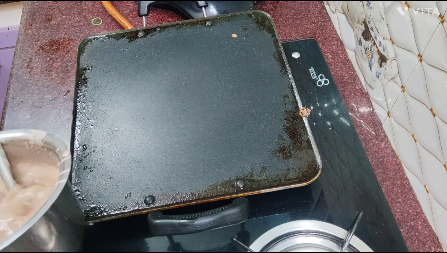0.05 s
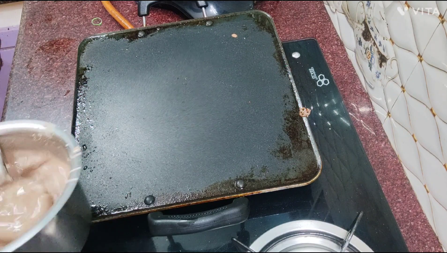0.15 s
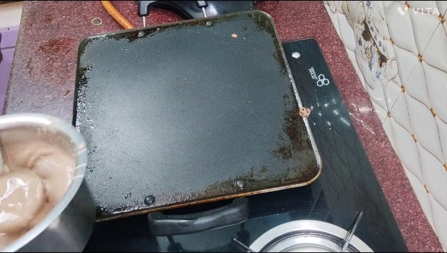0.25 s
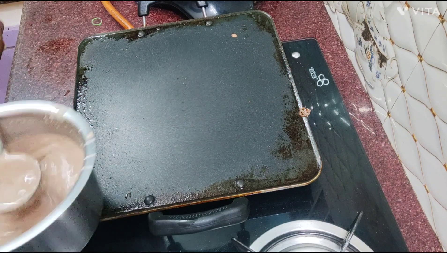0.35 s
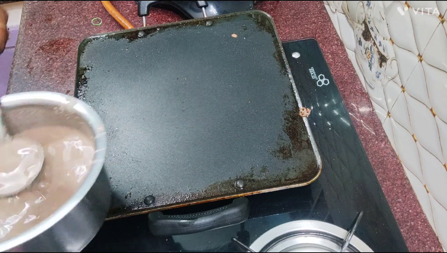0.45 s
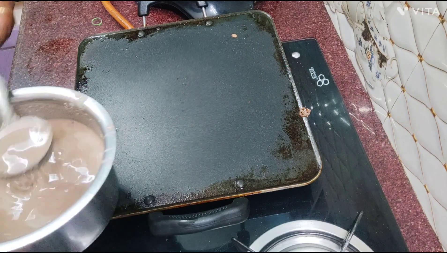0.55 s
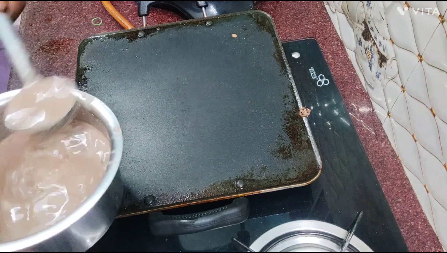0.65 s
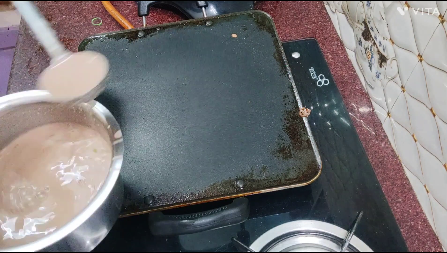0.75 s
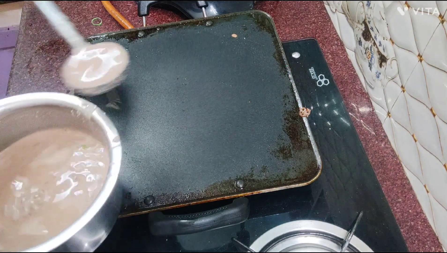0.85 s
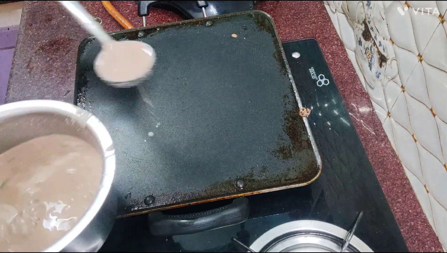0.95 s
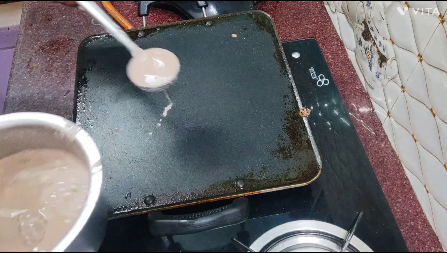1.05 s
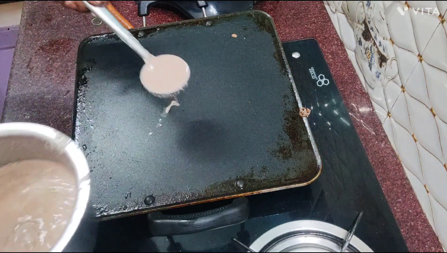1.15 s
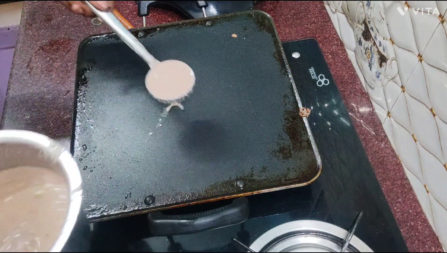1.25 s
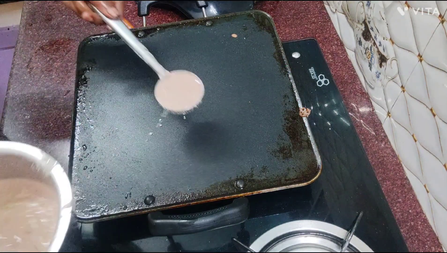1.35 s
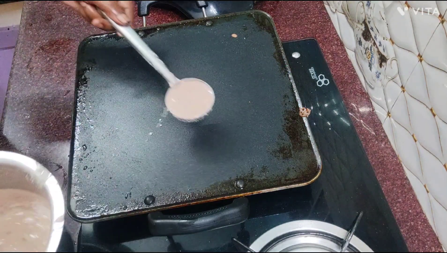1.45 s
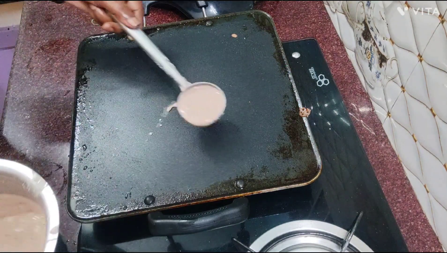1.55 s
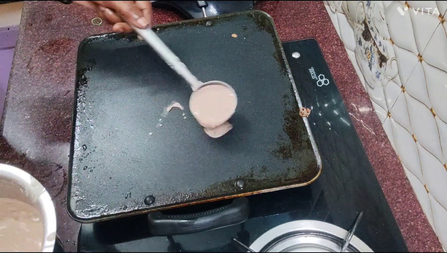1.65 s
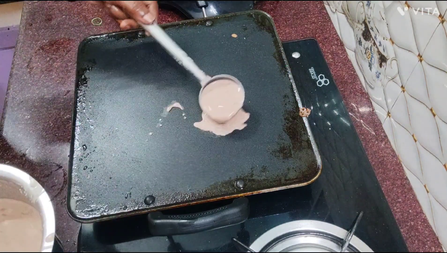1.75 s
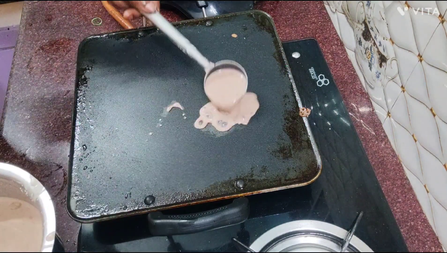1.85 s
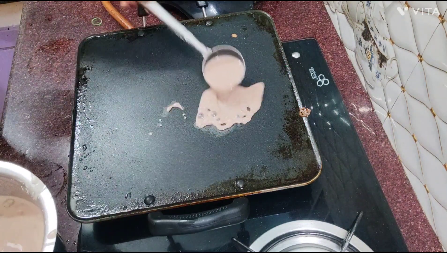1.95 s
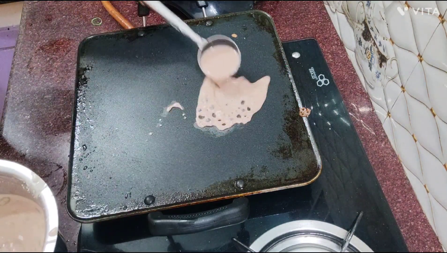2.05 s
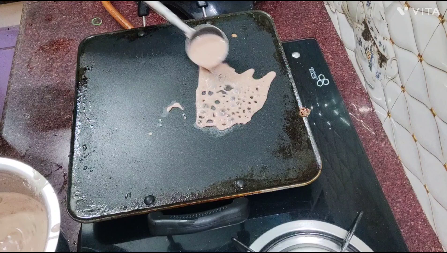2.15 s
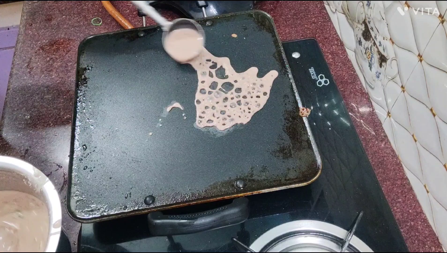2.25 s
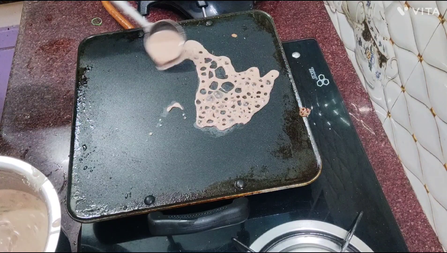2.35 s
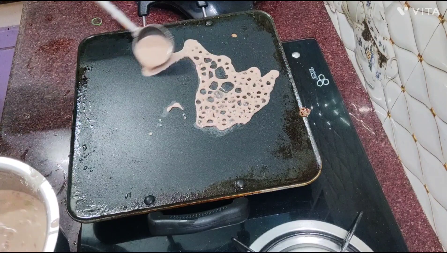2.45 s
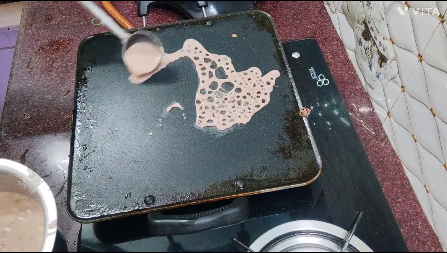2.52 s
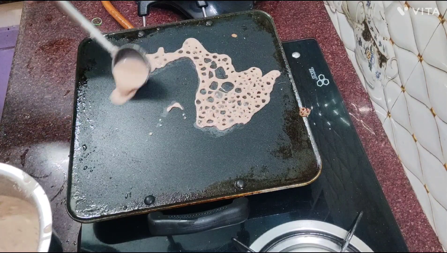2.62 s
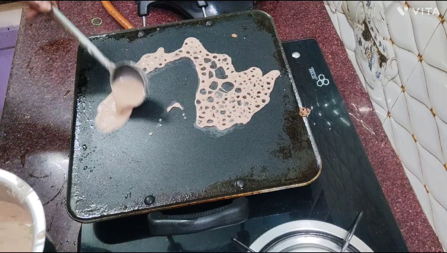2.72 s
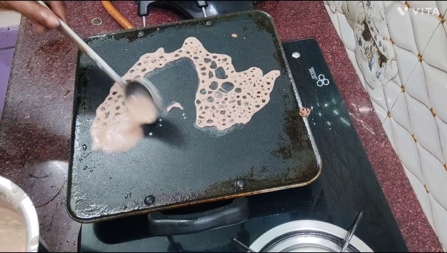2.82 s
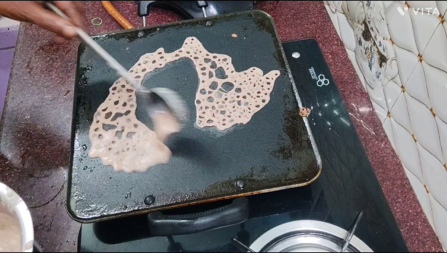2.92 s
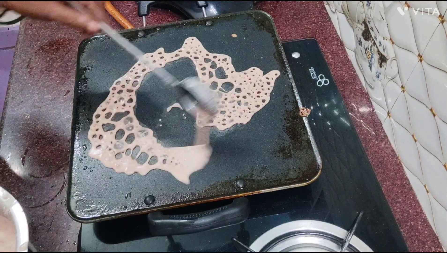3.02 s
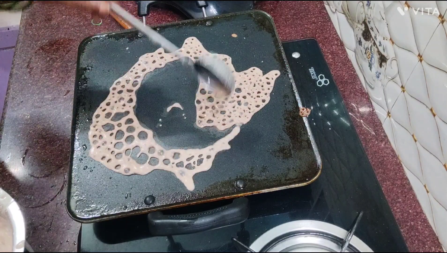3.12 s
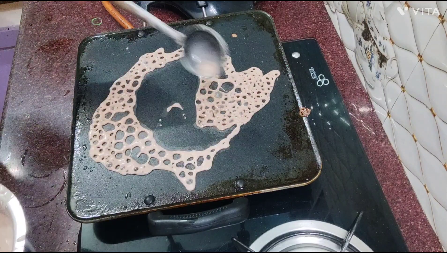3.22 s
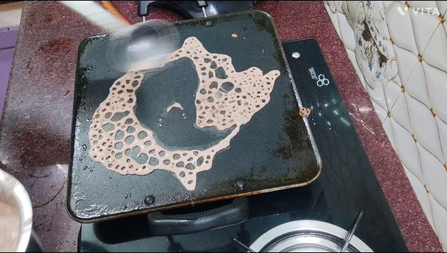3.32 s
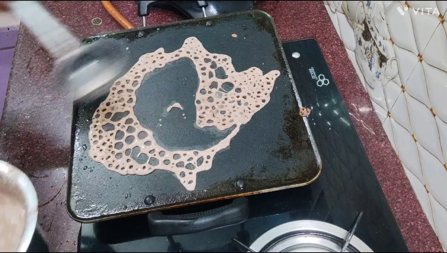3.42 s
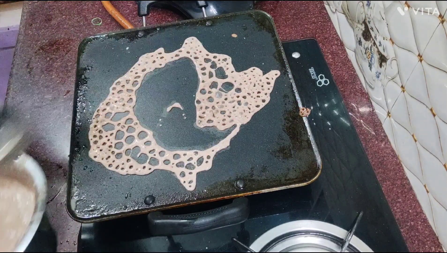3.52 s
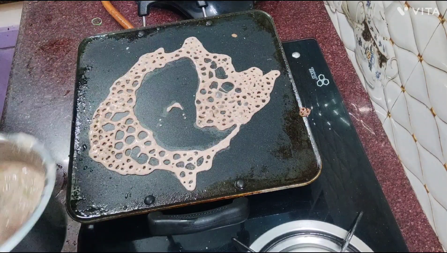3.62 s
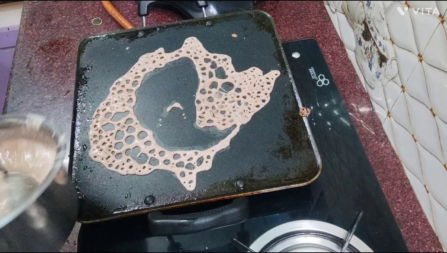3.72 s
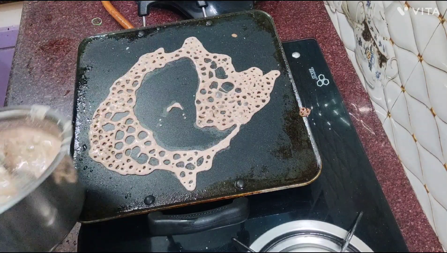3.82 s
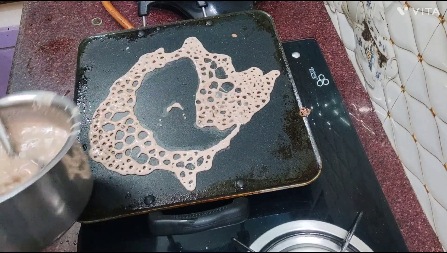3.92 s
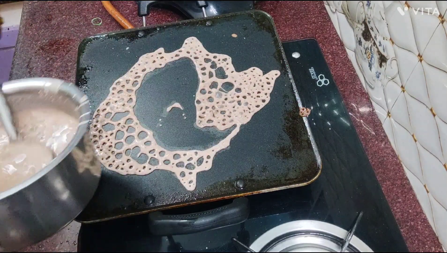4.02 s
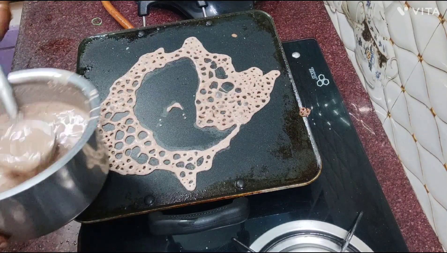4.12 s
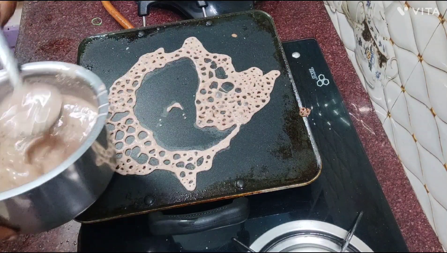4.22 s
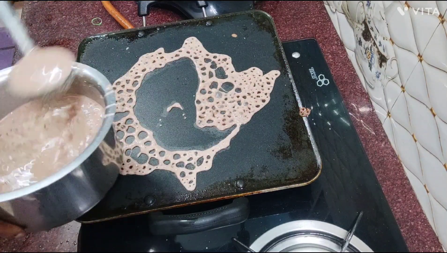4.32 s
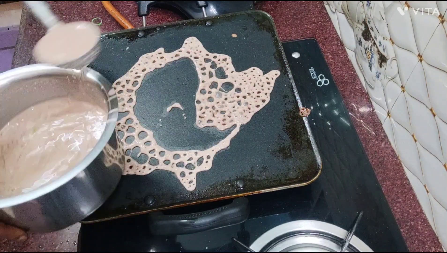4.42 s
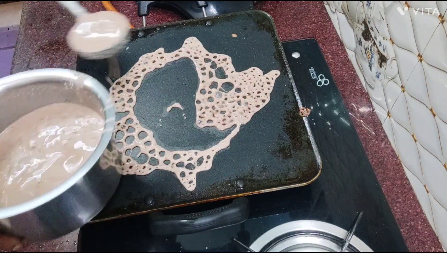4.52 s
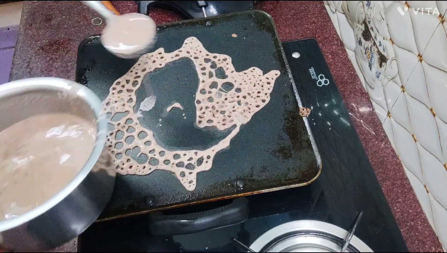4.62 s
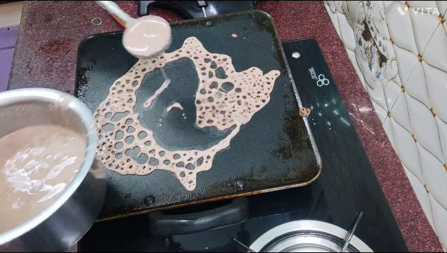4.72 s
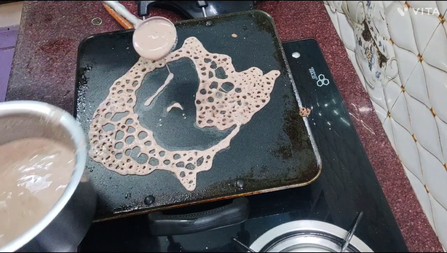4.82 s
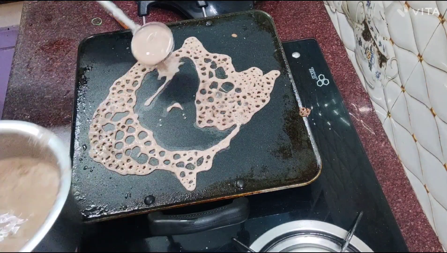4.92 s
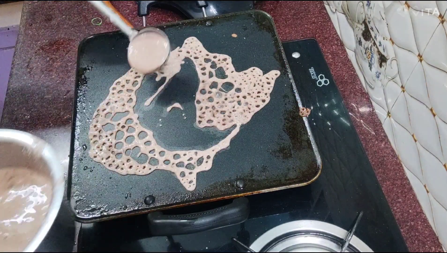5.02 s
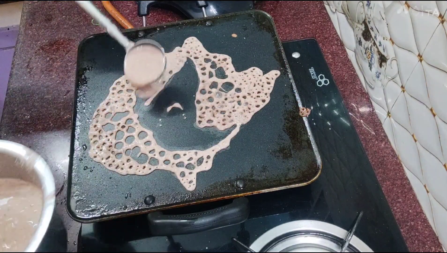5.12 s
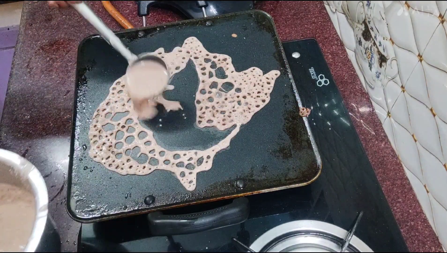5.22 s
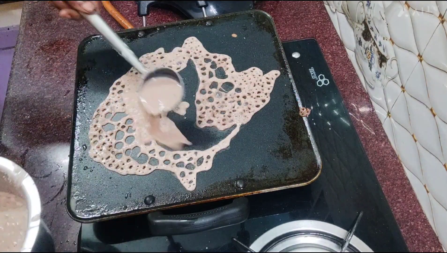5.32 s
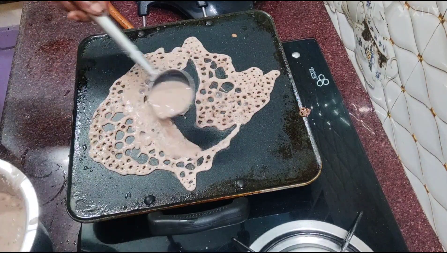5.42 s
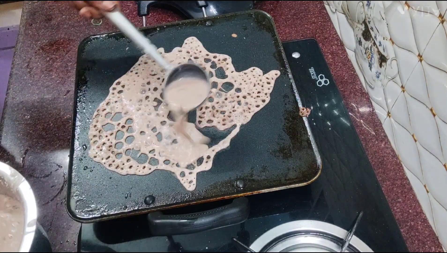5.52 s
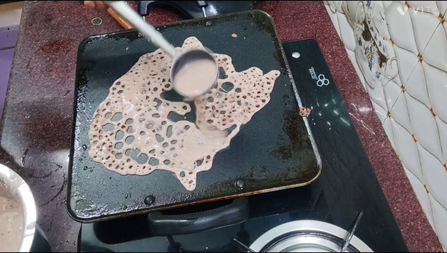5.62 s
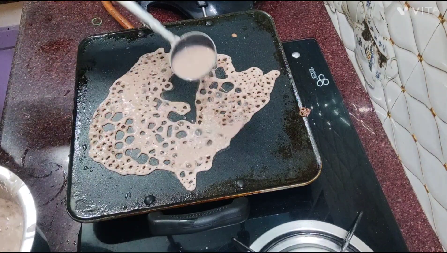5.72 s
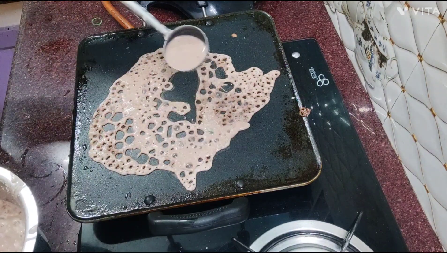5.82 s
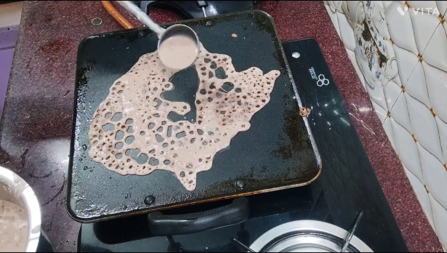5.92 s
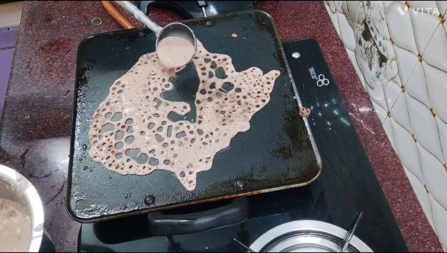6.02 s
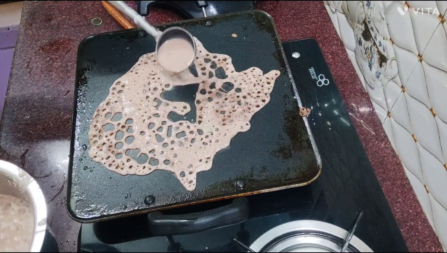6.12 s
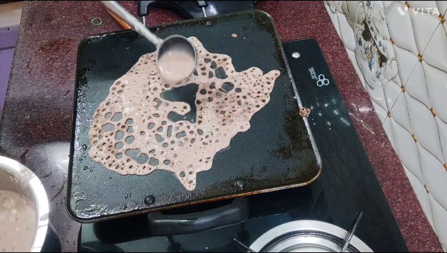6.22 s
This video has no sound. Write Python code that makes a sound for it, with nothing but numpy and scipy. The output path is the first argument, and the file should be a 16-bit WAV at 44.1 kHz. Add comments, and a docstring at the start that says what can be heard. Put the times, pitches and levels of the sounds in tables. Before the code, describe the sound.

A metal ladle ticks and scrapes lightly in a steel pot of batter, with a small wet gulp. Drops spit on a hot griddle, then poured batter builds into a loud, bright, fizzing sizzle. It softens, with scattered sharp pops, and swells again more gently with a second pour. A stove fan whirs faintly underneath, all heard from nearby in a small kitchen.

```python
"""A ladle ticks and scrapes in a steel pot of thin batter, then pours twice onto a hot griddle.
Thousands of tiny steam bubbles burst in the film as a fizz; each fresh pool boils with a deeper
rush, and single drops spit as they flash to steam. The hob's fan whirs below. The sound carries
through a small kitchen to two microphone ports, each of which rings most at its own treble pitch."""
import sys
import numpy as np
from scipy import signal
from scipy.fft import rfft, irfft, next_fast_len
from scipy.io import wavfile
from scipy.ndimage import map_coordinates

SR = 44100
rng = np.random.default_rng(int(sys.argv[2]) if len(sys.argv) > 2 else 0)


def to_wav(s):
    """Save 16-bit WAV."""
    ch = np.atleast_2d(s).T  # columns
    pcm = np.round(np.clip(ch, -1, 1) * 32767)  # PCM
    wavfile.write(sys.argv[1], SR, pcm.astype(np.int16))


N = 276066
BAND_LIMIT_HZ = 15600


def sizzle():
    """Random bubble bursts sum to shot noise: the denser they come, the less each one stands out."""
    # Spectra of the fizz and the boiling pool. Each row: frequency in Hz, level in dB.
    fizz_spectrum = [(300, -17), (1200, -16), (2500, -1.5), (4300, -4), (6000, 0), (9000, 1.5), (15500, 2)]
    boil_spectrum = [(200, -47), (500, -15.5), (900, -2), (1500, 1.5), (2200, 5), (2900, 3), (3700, -7),
                     (5500, 5), (8000, -15), (15000, -17)]
    thin_pitch_ratio = 2.02  # the smaller bubbles of a thin film ring higher
    surge_db, surges_per_s = 0.65, 18  # steam breaks out unevenly
    fizz_gain, thick_gain, thin_gain, lean = griddle()
    busy = fizz_gain / fizz_gain.max()
    clicks_per_s = 7000 + 12000 * busy
    pops_per_s = 750 + 3600 * busy ** 2
    fine = grains(clicks_per_s, spread_db=3.5, near_db=-2, room_db=-0.5)
    fine = unit(ports(colour(fine, fizz_spectrum)))
    pops = crackle(pops_per_s, hz=7880, scatter=0.15, swell_s=0.00026, spread_db=7, room_db=-1)
    sputter = crackle(pops_per_s / 3, hz=4400, scatter=0.25, swell_s=0.0004, spread_db=7, room_db=0)
    sputter_gain = amp(-16 + 2 * surge_db * wobble(surges_per_s))
    fizz = amp(-1) * fine + amp(-3) * unit(ports(pops)) + sputter_gain * unit(ports(sputter))
    boil = np.zeros((2, N))
    for gain, pitch in [(thick_gain, 1), (thin_gain, thin_pitch_ratio)]:
        bubbles = grains(clicks_per_s * 0.4, spread_db=3.5, near_db=1, room_db=0.5)
        boil += gain * unit(ports(colour(bubbles, np.multiply(boil_spectrum, [pitch, 1]))))
    clumps_db = (0.9 - 0.55 * busy) * wobble(45)  # quick clumps even out in a crowd
    flutter = amp(clumps_db + surge_db * wobble(surges_per_s))
    churn = amp(0.74 * wobble(24.02))  # the pool heaves at its own pace
    return (fizz_gain * flutter * fizz + boil * churn) * [lean, 1 / lean]


def griddle():
    """Incoherent patches add in power, giving gains for fizz, thick boil, thin boil and stereo lean."""
    # Batter meets hot iron. Each row: start in seconds, spreading time in seconds, fizz in dB,
    # boil in dB, share of the boil in thin film from 0 to 1, left minus right in dB.
    pours = [(1.188, 0.06, -43.5, -69, 0.4, -1), (1.41, 0.1, -44, -59, 0.4, 1),
             (1.898, 0.018, -37, -45.5, 0.4, -2.5), (1.98, 0.12, -33, -42.5, 0.04, -1.5),
             (2.21, 0.22, -28, -38, 0.17, -1.3), (2.518, 0.28, -26, -36.5, 0.5, -0.5),
             (2.99, 0.24, -21.5, -36.5, 0.25, 0), (3.4, 0.078, -27.5, -58, 0.7, -0.5),
             (4.55, 0.038, -44, -68, 0.6, -7), (4.83, 0.12, -39, -65, 0.2, -1.5),
             (5.21, 0.41, -33.5, -42, 0.2, 0.2), (5.73, 0.21, -35, -40, 1, -1.8)]
    fizz, thick, thin, weighted_pan = np.zeros((4, N))
    for start, spread_s, fizz_db, boil_db, thin_share, pan_db in pours:
        fizz_power = amp(fizz_db) ** 2 * patch(start, spread_s, fade_db_per_s=19, simmer_db=-21)
        boil_power = amp(boil_db) ** 2 * patch(start, spread_s, fade_db_per_s=13.5, simmer_db=-19)
        fizz += fizz_power
        weighted_pan += pan_db * fizz_power
        thick += (1 - thin_share) * boil_power
        thin += thin_share * boil_power
    lean = amp(weighted_pan / (fizz + 1e-20) / 2)
    return np.sqrt(fizz), np.sqrt(thick), np.sqrt(thin), lean


def patch(start, spread_s, fade_db_per_s, simmer_db, hold_s=0.1):
    """Sound power grows with the wetted area, holds, then decays to a simmer as the underside dries."""
    age = np.arange(N) / SR - start
    wetted = np.clip(age / spread_s, 0, 1)
    drying = amp(-fade_db_per_s * np.maximum(age - spread_s - hold_s, 0))
    return wetted * (drying ** 2 + amp(simmer_db) ** 2)


def grains(per_s, spread_db, near_db, room_db):
    """A Poisson stream of tiny uneven clicks, scaled so that its power is independent of its rate."""
    onsets = np.flatnonzero(rng.random(N) < per_s / SR)
    size = amp(spread_db * np.minimum(rng.standard_normal(N), 1.7))
    clicks = size * rng.choice([-1, 1], N) / np.sqrt(per_s)
    return spots(onsets, clicks[onsets, None], near_db, room_db, count=4)


def crackle(per_s, hz, scatter, swell_s, spread_db, room_db):
    """Larger bubbles are damped resonators, each ringing very briefly at its own pitch."""
    t = np.arange(SR // 200) / SR
    onsets = np.flatnonzero(rng.random(N) < per_s / SR)
    detune, size = rng.standard_normal((N, 2))[onsets].T[..., None]
    gain = amp(spread_db * np.minimum(size, 1.6)) / np.sqrt(per_s[onsets, None])
    envelope = t / swell_s * np.exp(-t / swell_s)
    rings = envelope * np.sin(2 * np.pi * hz * np.exp(scatter * detune) * t)
    return spots(onsets, gain * rings, near_db=-14, room_db=room_db, count=3)


def spots(onsets, bursts, near_db, room_db, count, new_spot_s=0.5):
    """Each source position has its own echoes; a few sound at once, new ones replacing the old."""
    pair = np.zeros((2, N))
    spot = (onsets / SR / new_spot_s + count * rng.random(N)[onsets]).astype(int)
    for k in np.unique(spot):
        at = onsets[spot == k]
        samples = at[:, None] - at[0] + np.arange(bursts.shape[1])
        track = np.bincount(samples.ravel(), bursts[spot == k].ravel(), at[-1] - at[0] + SR // 8)
        add(pair, at[0] / SR, kitchen(track, near_db, room_db))
    return pair


def spits():
    """Drops flash to steam in a pressure pulse; batter over them narrows its band to a pip."""
    # Each row: start in seconds, peak in dB, narrowness (1 is a bare crack, 2 a muffled pip).
    drops = [(1.5512, -18.5, 1), (1.647, -28, 1.4), (1.688, -21, 0.9), (1.6945, -27, 0.8),
             (1.766, -31.5, 1.5), (1.8444, -17, 0.85), (1.856, -29, 1.4), (1.871, -30, 1.2),
             (2.225, -20, 2), (2.883, -14.5, 2), (3.666, -12.5, 2), (3.933, -16, 2), (4.0667, -19.5, 1.8),
             (4.2603, -21.5, 1.8), (4.322, -22, 1.8), (4.531, -23, 1.8), (4.8983, -23, 1.8),
             (5.082, -22, 2), (5.2212, -21, 2), (5.2295, -21.5, 2), (5.327, -23, 1.7), (5.5618, -20, 2),
             (5.989, -15.5, 2.2)]
    # A bare crack. Each row: frequency in Hz, level in dB.
    crack_spectrum = [(100, -70), (600, -30), (2500, -16), (5000, -10), (8000, 0), (9500, 0), (11500, -4),
                      (15500, -6.5)]
    track = np.zeros((2, N))
    for start, db, narrowness in drops:
        spectrum = np.multiply(crack_spectrum, [1, narrowness])
        add(track, start, amp(db) * snap(spectrum, 12500, t60=0.0065, near_db=-15, room_db=-9))
    return track


def snap(spectrum, cutoff_hz, t60, near_db, room_db):
    """A short impulse is broadband: fast-decaying noise, heard through room and ports at unit peak."""
    t = np.arange(SR // 4) / SR
    envelope = amp(-60 * t / t60) * (1 - np.exp(-t / 0.00014))
    burst = envelope * rng.choice([-1, 1], len(t))
    burst = signal.lfilter(*signal.butter(4, min(cutoff_hz, BAND_LIMIT_HZ), fs=SR), burst)
    pair = ports(kitchen(colour(burst, spectrum), near_db, room_db))
    return pair / np.abs(pair.mean(axis=0)).max()


def squeak(start=3.3, length_s=0.052, hz=5650, db=-45, waver=0.026):
    """Steam trapped under the batter escapes as a jet, sounding a brief wavering whistle."""
    pitch_hz = hz * (1 + waver * wobble(500))
    tone = np.sin(2 * np.pi * np.cumsum(pitch_hz) / SR)
    return kitchen(amp(db) * swell(start, length_s) * tone, near_db=-12, room_db=-8)


def ladle():
    """Impacts tick and excite the pot's modes, differently at each spot; sliding friction scrapes."""
    # Ladle meets pot. Each row: start in seconds, tick peak in dB, ring level in dB,
    # cutoff in Hz (firm contacts are brighter).
    taps = [(0.0098, -38, -90, 7500), (0.092, -46, -70, 4300), (0.1943, -36, -66, 6500),
            (0.207, -44, -77, 9000), (0.29, -29, -68, 15000), (0.2925, -35, -78, 15000),
            (0.384, -33.5, -75, 10000), (0.4626, -39, -75, 12000), (0.667, -48, -86, 8000)]
    # Modes damped by batter. Each row: frequency in Hz, level in dB, 60 dB decay time in seconds.
    pot_modes = [(1850, -3, 0.025), (2400, -3, 0.025), (2950, -3, 0.025), (3480, -3, 0.075),
                 (3680, -4, 0.05), (4100, -4, 0.025), (4750, -7, 0.02)]
    # Slides along the wall. Each row: start in seconds, length in seconds, level in dB.
    strokes = [(0.01, 0.12, -70), (0.17, 0.2, -64), (0.317, 0.14, -52.5), (0.376, 0.042, -59),
               (0.44, 0.12, -61)]
    # Spectra of a tick and a scrape. Each row: frequency in Hz, level in dB.
    tick_spectrum = [(500, -15), (2000, -1), (3500, 1), (5500, 4), (8000, 4), (11000, 7), (15500, -1)]
    scrape_spectrum = [(500, -9), (2000, 4), (3100, 20), (4000, 11), (4650, 16), (5100, 8), (6000, 15),
                       (8400, 10.5), (11000, 12), (15500, 4)]
    detune, rasp_radians = 0.03, 0.14
    t = np.arange(SR // 4) / SR
    ring, ticks = np.zeros(N), np.zeros((2, N))
    for start, _, ring_db, _ in taps:
        for hz, mode_db, t60 in pot_modes:
            phase = 2 * np.pi * hz * (1 + detune * rng.normal()) * t
            phase += rasp_radians * np.cumsum(rng.standard_normal(len(t)))
            envelope = amp(ring_db + mode_db + rng.normal(0, 1.8) - 60 * t / t60)
            add(ring, start, envelope * np.sin(phase))
    for start, db, _, cutoff_hz in taps:
        add(ticks, start, amp(db) * snap(tick_spectrum, cutoff_hz, t60=0.011, near_db=-8, room_db=-7))
    pressure = sum(amp(db) * swell(start, length_s) for start, length_s, db in strokes)
    slips = grains(3500, spread_db=-4, near_db=5, room_db=2)  # steel catching on steel
    scrape = pressure * unit(ports(colour(slips, scrape_spectrum)))
    return ticks + scrape + kitchen(ring, near_db=12, room_db=16)


def squelch(start=0.31, length_s=0.35, db=-65):
    """Small, heavily damped air bubbles click as the ladle is drawn up through the batter."""
    bubbles = crackle(np.full(N, 260), hz=2100, scatter=0.33, swell_s=0.0008, spread_db=5, room_db=-3)
    return amp(db) * swell(start, length_s) * unit(bubbles)


def gulps():
    """Air pockets resonate, and their pitch can rise as the batter closes over them."""
    # Each row: start in seconds, level in dB, starting pitch in Hz, rise in octaves per second,
    # 60 dB decay time in seconds.
    pockets = [(0.478, -38, 715, 11, 0.14), (4.025, -33, 660, 0, 0.014), (4.038, -42.5, 540, 2, 0.1)]
    track, t = np.zeros(N), np.arange(SR // 8) / SR
    for start, db, hz, rise, t60 in pockets:
        phase = 2 * np.pi * np.cumsum(hz * 2 ** (rise * t)) / SR
        envelope = amp(db - 60 * t / t60) * (1 - np.exp(-t / 0.0011))
        add(track, start, envelope * np.sin(phase))
    return kitchen(track, near_db=-31, room_db=-11)


def stove_knock(start=2.104):
    """A soft knock excites only the stove's low modes, which die away as a thud."""
    # Each row: frequency in Hz, level in dB, 60 dB decay time in seconds.
    stove_modes = [(45, -43.5, 0.065), (140, -43, 0.045)]
    track, t = np.zeros(N), np.arange(SR // 4) / SR
    for hz, db, t60 in stove_modes:
        add(track, start, amp(db - 60 * t / t60) * np.sin(2 * np.pi * hz * t))
    return track


def fan():
    """The hob's fan moves air: a low resonant whir under a soft broadband rush."""
    # Spectra of the whir and the rush. Each row: frequency in Hz, level in dB.
    whir_spectrum = [(20, -3), (45, -10.5), (75, -10), (112, -6.5), (134, 2.5), (150, -1), (172, -2.5),
                     (198, -6.5), (260, 0), (304, -5), (330, -0.5), (365, -11), (470, -11), (700, -57)]
    rush_spectrum = [(240, -39), (400, -9), (534, -1.5), (854, -3), (1090, -4.5), (1390, -8), (2510, -15),
                     (4530, -27), (8690, -18.5), (12100, -43), (15000, -68)]
    return amp(-54.5) * airflow(whir_spectrum) + amp(-55.5) * airflow(rush_spectrum)


def airflow(spectrum):
    """Moving air makes steady noise, partly coherent between the two ports and most so in the bass."""
    # Each row: frequency in Hz, correlation between the ports (limited to 1 below).
    coherence = [(25, 0.5), (70, 0.3), (140, 1.1), (250, 0.6), (500, 0.67), (900, -0.18), (8000, 0.3)]
    # Each row: frequency in Hz, left minus right in dB.
    balance = [(25, 5), (110, 1.5), (380, 6), (700, 4), (1300, 2.5), (2400, 0), (5500, -4), (7500, -13),
               (9200, 5), (12000, 0)]
    size = next_fast_len(N)
    hz = np.fft.rfftfreq(size, 1 / SR)
    common, opposed = rfft(rng.standard_normal((2, size))) * amp(along(spectrum, hz))
    angle = np.arccos(np.clip(along(coherence, hz), -1, 1)) / 2
    mid, side = common * np.cos(angle), opposed * np.sin(angle)
    lean = amp(along(balance, hz) / 2)
    return unit(irfft([(mid + side) * lean, (mid - side) / lean], size)[:, :N])


def kitchen(x, near_db, room_db, near_t60=0.043):
    """Convolution sums the direct sound, early reflections off griddle and tiles, and reverberation."""
    # Each row: frequency in Hz, reverberation time in seconds.
    reverb_times = [(200, 0.24), (2000, 0.1), (8000, 0.15), (15000, 0.0091)]
    hz, frame_s, noise = signal.stft(rng.standard_normal((2, SR // 4)), SR, nperseg=256)
    decay = amp(-60 * frame_s / along(reverb_times, hz)[:, None])
    tail = signal.istft(noise * decay, SR, nperseg=256)[1]
    t = np.arange(tail.shape[1]) / SR
    near = rng.standard_normal(tail.shape) * amp(-60 * t / near_t60)
    response = sum(amp(db) * echoes / np.linalg.norm(echoes, axis=1, keepdims=True)
                   for db, echoes in [(near_db, near), (room_db, tail)])
    response[:, 0] += 1  # direct sound
    return signal.oaconvolve(x[None], response, axes=1)[:, :len(x)]


def ports(pair):
    """The two microphone ports resonate in phase, each loudest at its own pitch."""
    # Each row: frequency in Hz, left gain in dB, right gain in dB.
    resonances = [(1000, 2, 0), (4000, -1, 1), (5900, 0, 4.5), (6900, 2.5, 11.5), (7600, 7, 17),
                  (8100, 7.5, 14.5), (8500, 11, 11), (9050, 13.5, 9), (9600, 8, 2), (10400, -3, -4.5),
                  (12000, -6.5, -6), (15500, -6.5, -5.5)]
    hz, left_db, right_db = np.transpose(resonances)
    shared = colour(pair, np.transpose([hz, (left_db + right_db) / 2]))
    lean_points = np.transpose([hz, (left_db - right_db) / 2])
    lean = amp(along(lean_points, np.fft.rfftfreq(256, 1 / SR)))
    kernels = np.roll(irfft([lean, 1 / lean]), 127, axis=1)  # centred for zero phase
    return signal.oaconvolve(shared, kernels, mode="same", axes=1)


def colour(x, spectrum):
    """A minimum-phase filter, made by folding the cepstrum, imposes a spectrum of (Hz, dB) points."""
    size = 2 ** 13
    cepstrum = irfft(np.log(amp(along(spectrum, np.fft.rfftfreq(size, 1 / SR)))))
    cepstrum[1:size // 2] *= 2
    cepstrum[size // 2 + 1:] = 0
    kernel = irfft(np.exp(rfft(cepstrum)))
    kernel = kernel.reshape((1,) * (x.ndim - 1) + (-1,))
    return signal.oaconvolve(x, kernel, axes=-1)[..., :x.shape[-1]]


def amp(db):
    """Decibels to amplitude ratio."""
    return 10 ** (np.asarray(db) / 20)


def unit(pair):
    """Scale a stereo pair so that its channel mean has rms 1."""
    return pair / np.sqrt(np.mean(pair.mean(axis=0) ** 2) + 1e-20)


def along(points, hz):
    """Interpolate (Hz, value) points on a logarithmic frequency axis."""
    knots_hz, values = np.transpose(points)
    return np.interp(np.log(hz + 1), np.log(knots_hz + 1), values)


def wobble(per_s):
    """A smooth curve through per_s random values a second."""
    knots = rng.standard_normal(int(N * per_s / SR) + 4)
    return map_coordinates(knots, [np.arange(N) * per_s / SR])


def swell(start, length_s):
    """A half-sine envelope."""
    return np.sin(np.pi * np.clip((np.arange(N) / SR - start) / length_s, 0, 1))


def add(track, start, sound):
    """Mix a sound into a track at a start time in seconds."""
    part = track[..., max(round(start * SR), 0):][..., :sound.shape[-1]]
    part += sound[..., :part.shape[-1]]


def scene():
    """Superposition: the pressures of all the sources add."""
    return sizzle() + spits() + squeak() + ladle() + squelch() + gulps() + stove_knock() + fan()


def record(dry):
    """An ideal low-pass filter passes nothing above the band limit."""
    size = next_fast_len(N + SR // 4)
    passband = np.fft.rfftfreq(size, 1 / SR) < BAND_LIMIT_HZ
    return irfft(rfft(dry, size) * passband, size)[:, :N]


dry = scene()
out = record(dry)
to_wav(out)
```